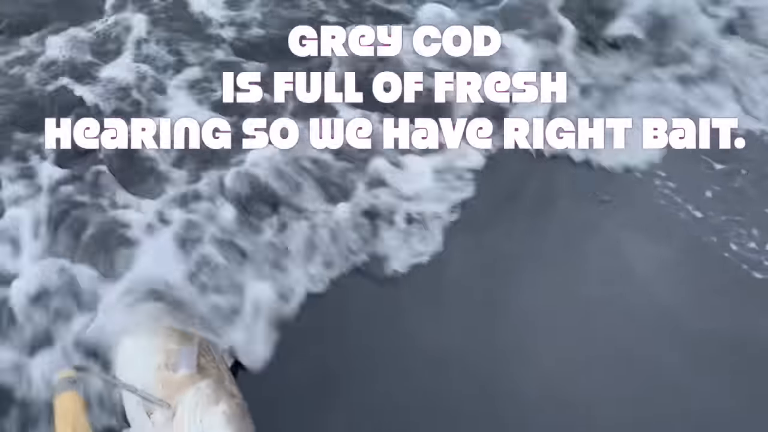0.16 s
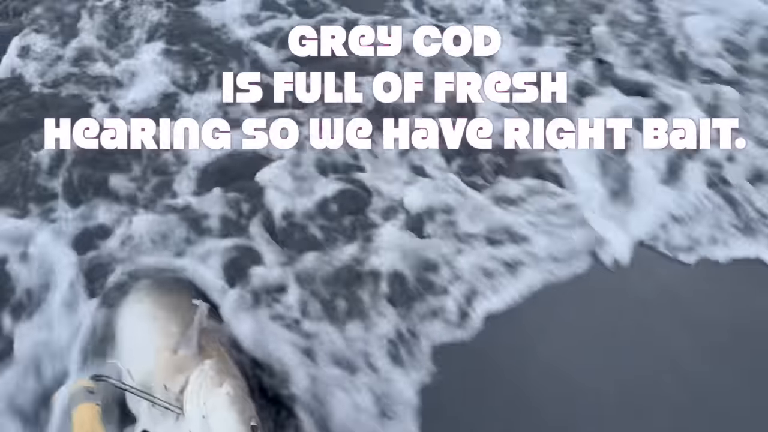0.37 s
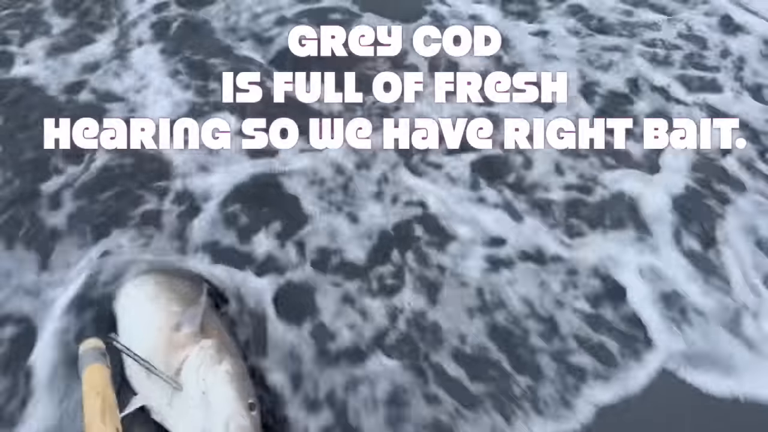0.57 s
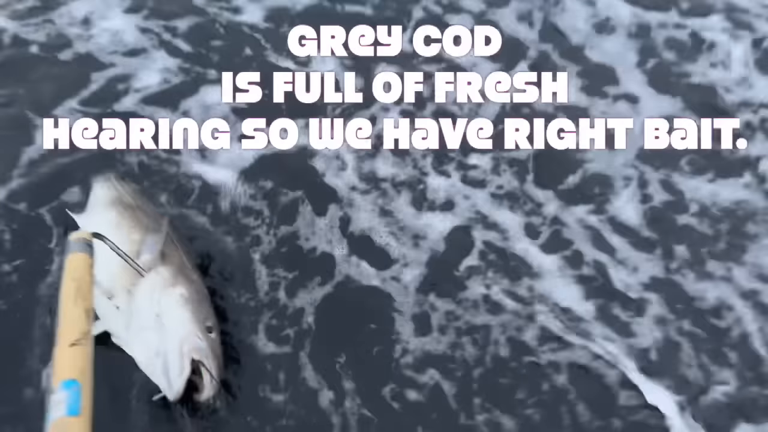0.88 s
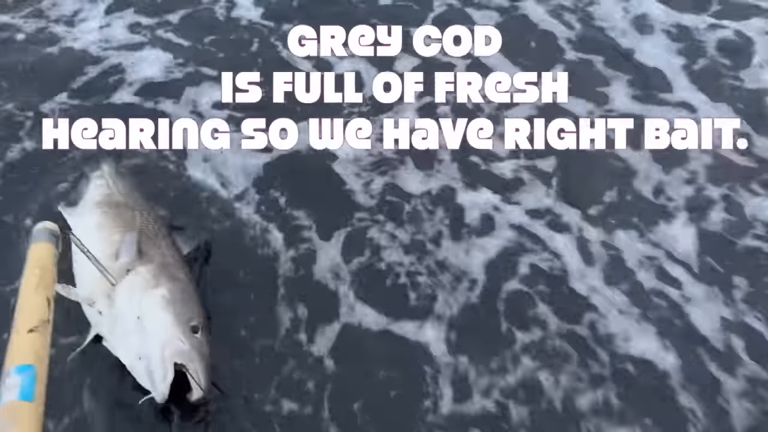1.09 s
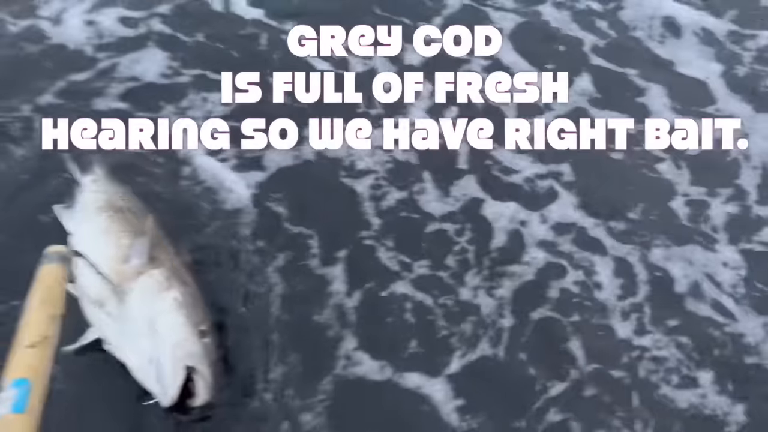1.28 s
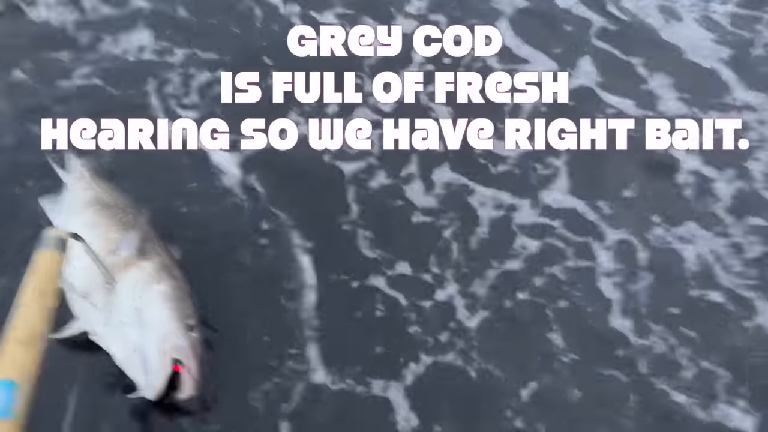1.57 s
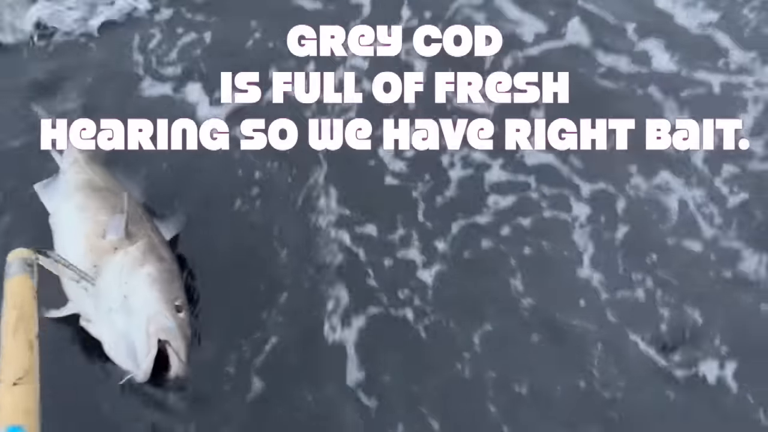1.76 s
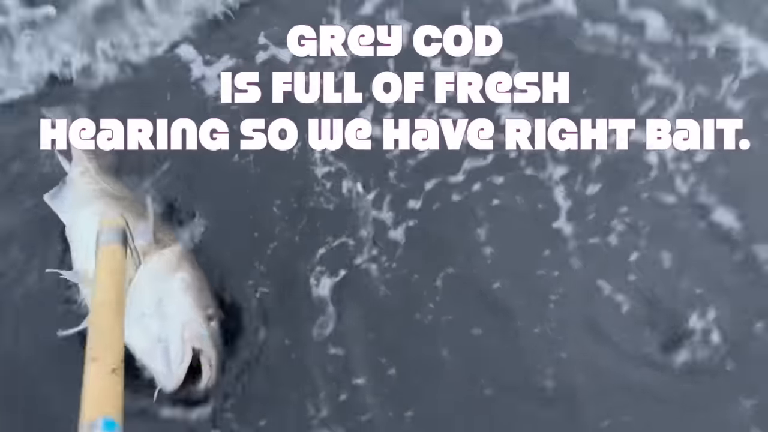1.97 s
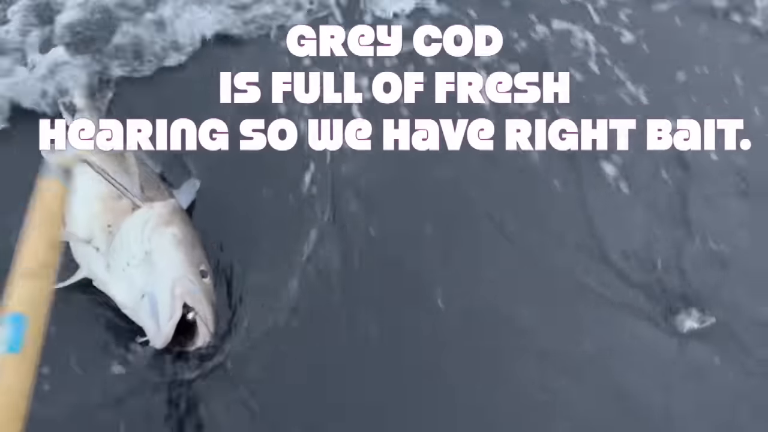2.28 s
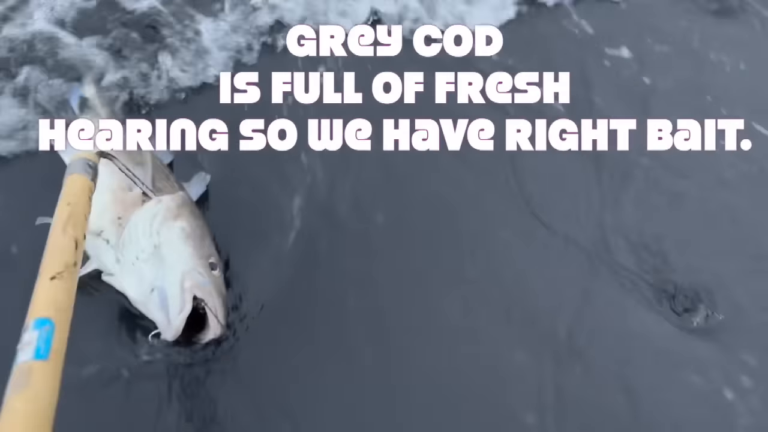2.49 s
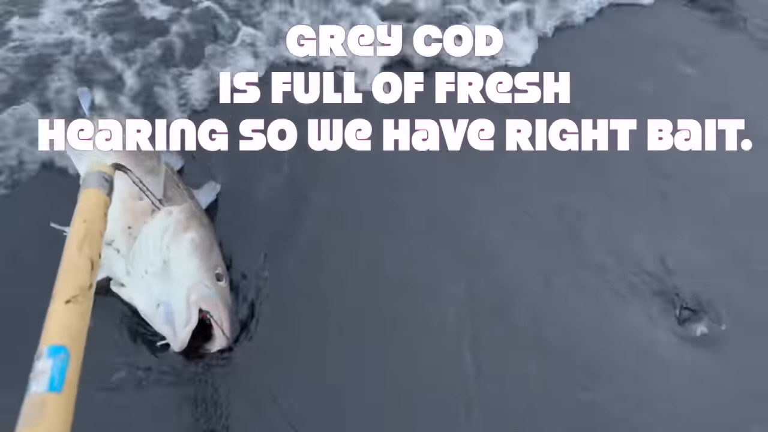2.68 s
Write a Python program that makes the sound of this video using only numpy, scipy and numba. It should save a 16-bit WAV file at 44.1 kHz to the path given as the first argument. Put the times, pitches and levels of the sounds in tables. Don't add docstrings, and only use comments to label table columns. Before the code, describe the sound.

Small waves wash up a flat beach close to a hand-held phone: low foam fizz and wind knocks first, then a fuller rush with a dull breaker and bubbling, then thin hissing water draining away.

```python
import sys
import numpy as np
from scipy import signal
from scipy.fft import rfft, irfft
from scipy.io import wavfile
from scipy.ndimage import uniform_filter1d
from numba import njit

SR = 44100
rng = np.random.default_rng(int(sys.argv[2]) if len(sys.argv) > 2 else 0)


def voltage_ratio(decibels):
    exponent = np.asarray(decibels, float) / 20
    return 10 ** exponent


def unload_wav(signal):
    wavfile.write(
        sys.argv[1],
        SR,
        np.round(np.clip(np.atleast_2d(signal).T, -1, 1) * 32767).astype(np.int16),
    )


N = 125685
PORT_LEAD_S = 0.00055


def colour(table, hz):
    point_hz, value = np.array(table).T
    return np.interp(np.log(np.maximum(hz, 1)), np.log(point_hz), value)


def unit(x):
    return x / np.sqrt(np.mean(x ** 2))


def late(x, s):
    hz = np.fft.rfftfreq(N, 1 / SR)
    return irfft(rfft(x) * np.exp(-2j * np.pi * hz * s), N)


def walk(rate_hz):
    hold = int(SR / rate_hz)
    steps = np.repeat(rng.standard_normal(N // 500)[:N // hold + 1], hold)
    slewed = uniform_filter1d(uniform_filter1d(steps, hold), hold)
    return unit(slewed[:N])


@njit
def grains(length, at, step, turns, size, glide):
    y = np.zeros(length)
    for g in range(len(at)):
        tau = turns[g] / step[g] / 3
        phase = 0.
        for i in range(min(int(8 * tau), length - at[g])):
            phase += step[g] * (1 + glide * i / (8 * tau))
            swell = np.e * i / tau * np.exp(-i / tau)
            y[at[g] + i] += size[g] * swell * np.sin(2 * np.pi * phase)
    return y


def knocks(rows, turns, lead_s, glide):
    s, db, hz, pan_db = rows.T
    start_s = np.maximum(s - turns / hz / 3, 0)
    at = (start_s * SR).astype(int)
    left, right = (grains(N, at, hz / SR, turns + 0 * hz, voltage_ratio(db + k * pan_db / 2), glide) for k in (1, -1))
    return np.array([left, late(right, lead_s)])


def water(table, shared, lead_s):
    swell_db, patch_db, flicker_db = 0.3, 0.4, 1.2
    hz = np.fft.rfftfreq(N, 1 / SR)
    swell = walk(7.5)
    both, left, right = rfft(rng.standard_normal((3, N))) * voltage_ratio(colour(table, hz))
    share = np.clip(colour(shared, hz), 0, 1)
    lead = np.exp(1j * np.pi * hz * colour(lead_s, hz) * np.array([[1], [-1]]))
    pair = np.sqrt(1 - share) * np.array([left, right]) + np.sqrt(share) * both * lead
    patch = [walk(10.72) for _ in range(6)]
    out = 0
    for k in range(-3, 15):
        away = np.clip(2 * np.log2(np.maximum(hz, 1) / 125) - k, -1, 1)
        band = irfft(pair * np.cos(np.pi / 2 * away) ** 2, N)
        db = swell_db * swell + patch_db * patch[k // 3] + flicker_db * walk(23.77)
        out = out + voltage_ratio(db) * band
    return unit(out)


# peak in seconds, peak level in dB, pitch in Hz, left over right in dB.
PUFF_ROWS = [(.012, -31, 400, 5), (.0775, -30, 920, 6), (.127, -24, 830, 11), (.185, -27, 420, 7),
             (.2027, -29, 620, 9), (.2087, -21, 730, 11), (.2572, -27, 600, 6), (.318, -27, 480, 6),
             (.325, -29, 750, 6), (.342, -28, 800, 4), (.3615, -27, 700, 5), (.3663, -27, 890, 5),
             (.371, -28, 520, 5), (.3865, -24, 1050, 7), (.39, -22, 680, 8), (.407, -27, 600, 6),
             (.419, -28, 650, 6), (.442, -27, 620, 7), (.4567, -26.5, 660, 10), (.4649, -20.5, 660, 10),
             (.483, -17, 830, 11), (.4875, -25, 950, 9), (.5805, -27, 840, 5), (.597, -23, 800, 10),
             (.6413, -27, 800, 7), (.6613, -24.5, 810, 6), (.7266, -25, 1100, 7), (.7444, -28, 670, 7),
             (.757, -22.5, 1000, 8), (.783, -28, 735, 4), (.9414, -21, 650, 6), (.9654, -27, 710, 10),
             (1.0387, -25, 730, 8), (1.9833, -32, 520, 7), (2.062, -30, 520, 7), (2.09, -26, 1050, 8),
             (2.1532, -30, 500, 7), (2.2188, -24, 530, 8), (2.277, -33, 460, 5), (2.4817, -24, 620, 9),
             (2.8247, -31, 860, 3)]
# time in seconds, corner in Hz.
BASS_CUT = [(0, 290), (.12, 287), (.2, 331), (.27, 467), (.36, 368), (.48, 390), (.53, 450), (.72, 407),
            (.86, 360), (1.06, 265), (1.4, 284), (1.54, 250), (1.6, 149), (1.67, 278), (1.82, 344),
            (2.05, 288), (2.33, 411), (2.65, 255)]


def wind():
    flutter_per_s, flutter_db, flutter_db_per_oct = 150, -41, -7.5
    puff_db, eddy_db, eddy_s = 0.5, -19, 0.0123
    where, pitch, big = rng.random((400, 3))[:int(flutter_per_s * N / SR)].T
    s = where * N / SR
    gust_db = flutter_db_per_oct * np.log2(np.interp(s, *np.array(BASS_CUT).T) / 350)
    level_db = flutter_db + gust_db - 2.0 * np.log(big + 0.1)
    flutter = np.c_[s, level_db, 380 * 2.5 ** pitch, 7 + 0 * big]
    puffs = np.array(PUFF_ROWS) + [0, puff_db, 0, 0]
    eddies = rng.random((len(puffs), 3, 4)).transpose(1, 0, 2)
    eddy = puffs * [0.98, 0.94, 0.76, 1.0] + [-0.6 * eddy_s, eddy_db, 0, 0]
    eddy = eddy + eddies * [1.6 * eddy_s, 3, 300, 0]
    return knocks(np.concatenate([puffs, *eddy, flutter]), turns=1.8, lead_s=PORT_LEAD_S, glide=-0.11)


# frequency in Hz, density in dB per Hz.
BREAKER_COLOUR = [(40, -1), (120, 1), (300, 2.5), (600, 0), (1000, -7), (1600, -11), (2600, -14),
                  (5000, -40)]


def breaker():
    return water(BREAKER_COLOUR, [(1, 0.96)], [(1, -0.00087)])


# start in seconds, length in seconds, first pitch in Hz, last pitch in Hz, level in dB.
POCKET_ROWS = [(1.143, .1, 1930, 2160, -38), (1.252, 0.082, 1530, 1760, -35.5),
               (1.272, 0.069, 2000, 2110, -38), (1.283, 0.08, 822, 866, -36.5),
               (1.345, 0.11, 953, 1115, -36), (1.412, .07, 359, 396, -37), (1.423, .07, 1660, 1570, -42),
               (1.52, .03, 430, 440, -41), (1.59, 0.041, 265, 335, -38.5), (1.828, 0.063, 860, 950, -49.5),
               (2.053, 0.035, 415, 476, -47), (2.521, .03, 874, 960, -47.5),
               (0.348, 0.048, 1276, 1585, -43.5), (2.388, 0.041, 3800, 4600, -47),
               (2.745, 0.079, 1970, 2070, -46), (0.618, 0.067, 1960, 2080, -43.5),
               (.74, 0.023, 2050, 2085, -47)]


def pockets():
    ring_s, scatter, bubbles_each = 0.011, 0.06, 14
    s, length, from_hz, to_hz, db = np.array(POCKET_ROWS).T[:, :, None]
    along, off, big = rng.random((len(POCKET_ROWS), bubbles_each, 3)).transpose(2, 0, 1)
    hz = (from_hz + (to_hz - from_hz) * along) * (1 + scatter * (2 * off - 1))
    rows = np.array([s + length * along, db + 2.0 * big, hz, 0 * hz])
    return knocks(rows.reshape(4, -1).T, ring_s * hz.ravel(), lead_s=0.0001, glide=0.05)


# peak in seconds, peak level in dB, pitch in Hz.
SPIT_ROWS = [(.0447, -26, 8500), (.1332, -25, 8800), (.3898, -29, 4100), (.6846, -29, 2700),
             (.888, -27, 6000), (1.2265, -22, 2100), (1.24, -23, 6500), (1.4532, -24, 2700),
             (1.5642, -24, 2200), (1.9783, -25, 7500), (2.3535, -22.5, 2100), (2.3555, -27, 2700),
             (2.4035, -29, 5000), (2.4055, -30, 3900), (2.327, -29, 5200), (2.421, -29, 4000),
             (2.7424, -31, 4200), (2.7426, -24, 6000), (2.7445, -28, 1900), (2.8039, -30, 2300)]


def spits():
    rows = np.array(SPIT_ROWS) + [0, -0.5, 0]
    turns = np.maximum(2.8, 0.001 * rows[:, 2])
    return knocks(np.c_[rows, np.zeros(len(rows))], turns, PORT_LEAD_S, glide=0.058)


# frequency in Hz, density in dB per Hz.
SIZZLE_COLOUR = [(3000, -8), (6000, -12), (9000, 3.5), (12000, -1.5), (16000, 0)]
# frequency in Hz, left port lead in seconds.
FOAM_LEAD = [(500, .00042), (1300, .00041), (2000, .00049), (2700, .00057)]


def sizzle():
    return water(SIZZLE_COLOUR, [(1, 0.2)], FOAM_LEAD)


# frequency in Hz, density in dB per Hz.
FOAM_COLOUR = [(250, -27.5), (700, -2), (1500, -2.5), (2400, -5.5), (3500, -7.5), (6000, -8), (9000, -14),
               (16000, -28)]


def bubbles():
    per_s, spread_db, turns = 1500, 2, 6.3
    where, pitch, side, big = rng.random((6000, 4))[:int(per_s * N / SR)].T
    hz = 400 * 30 ** pitch
    size = voltage_ratio(-spread_db * np.log(big + 0.0088) + colour(FOAM_COLOUR, hz)) * np.sqrt(hz)
    ports = []
    for k in range(2):
        at = (where * N).astype(int) + int(k * PORT_LEAD_S * SR)
        ports.append(grains(N, at, hz / SR, turns + 0 * hz, size * abs(k - side), 0.28))
    return unit(np.array(ports))


# frequency in Hz, share heard by both ports from 0 to 1.
FOAM_SHARE = [(300, 0.71), (1300, 0.77), (2800, 0.46), (4500, 0.017), (6500, 0.028), (9000, 0.031),
              (15000, 0.1)]


def foam(body_db):
    fizz = water(FOAM_COLOUR, FOAM_SHARE, FOAM_LEAD) + voltage_ratio(-5) * bubbles()
    body = signal.sosfiltfilt(signal.butter(2, 2480, fs=SR, output="sos"), fizz)
    return fizz + body * (voltage_ratio(body_db) - 1)


# time in seconds, foam in dB, breaker in dB, sizzle in dB, extra foam body in dB.
SURGE_LEVELS = [(0, -43.5, -44, -45.5, 0), (.26, -45.5, -42, -47, -0.5), (.4, -43.5, -40, -43.5, -0.5),
                (.68, -42.5, -45, -43, 4), (.91, -40, -49.5, -43.5, 2.5), (1.15, -37.5, -43, -41.5, 2.5),
                (1.29, -34, -37, -43, 0.5), (1.4, -37.5, -35.5, -44, 5.5), (1.52, -38, -34.5, -43.5, 3),
                (1.63, -37.5, -39, -46.5, 2.5), (1.74, -38.5, -49, -46.5, -1), (2.03, -41, -41, -49, -1),
                (2.3, -40.5, -44, -49.5, -1), (2.45, -42, -46.5, -48.5, -1.5), (2.68, -47.5, -47, -49, 4.5),
                (2.76, -43, -47, -46.5, 2), (2.85, -46.5, -46.5, -47, 4.5)]


def scene():
    s, *levels = np.array(SURGE_LEVELS).T
    t = np.arange(N) / SR
    foam_db, breaker_db, sizzle_db, body_db = (np.interp(t, s, level) for level in levels)
    beach = wind() + pockets() + spits()
    beach = beach + breaker() * voltage_ratio(breaker_db + 4)
    beach = beach + sizzle() * voltage_ratio(sizzle_db + 3.5)
    return beach + foam(body_db) * voltage_ratio(foam_db + 4.5)


def low_pass(x):
    return signal.sosfilt(signal.butter(12, 16670, fs=SR, output="sos"), x)


# frequency in Hz, left port over the mean of both in dB.
LEFT_PORT_COLOUR = [(200, 0.5), (600, 0), (1300, 1), (2000, -1.5), (3000, -0.5), (5000, 2), (8500, -1.1),
                    (12000, -0.5)]


def record(dry):
    steepness, leak_db, gate_share = 6.64, -48, 0.76
    gap_low_hz, gap_high_hz, side_top_hz, top_hz = 10330, 12330, 13120, 15740
    open_from_s, open_to_s, joint_db = 0.127, 0.148, 2.5
    hz, t, z = signal.stft(dry, SR, nperseg=1024, noverlap=768)
    hz = np.maximum(hz, 1)[:, None]
    corner_hz = np.interp(t, *np.array(BASS_CUT).T)
    leak = voltage_ratio(leak_db + 2.3 * np.interp(t * SR, np.arange(N), walk(45)))
    cut = (hz > gate_share * corner_hz) / np.sqrt(1 + (corner_hz / hz) ** (2 * steepness)) + leak
    port_db = colour(LEFT_PORT_COLOUR, hz) * np.array([1, -1])[:, None, None]
    left, right = z * cut * voltage_ratio(port_db)
    held = np.repeat(rng.random((3, 100)), 6, axis=1)[:, :len(t)]
    low_jump = 230 * (held[0] < 0.15)
    high_jump = -290 * (held[1] < 0.15)
    side_jump = 400 * (held[2] < 0.3)
    joint = (t < open_from_s) | (t > open_to_s)
    no_mid = joint & (hz > gap_low_hz + low_jump) & (hz < gap_high_hz + high_jump)
    no_side = joint & (hz > side_top_hz + side_jump)
    mid = (left + right) / 2 * ~no_mid * voltage_ratio(joint_db * no_side) * (hz < top_hz)
    side = (left - right) / 2 * ~no_side * voltage_ratio(joint_db * no_mid) * (hz < top_hz)
    ports = np.array([mid + side, mid - side])
    mix = signal.istft(ports, SR, nperseg=1024, noverlap=768)[1][:, :N]
    return low_pass(mix)


dry = scene()
out = record(dry)
unload_wav(out)
```